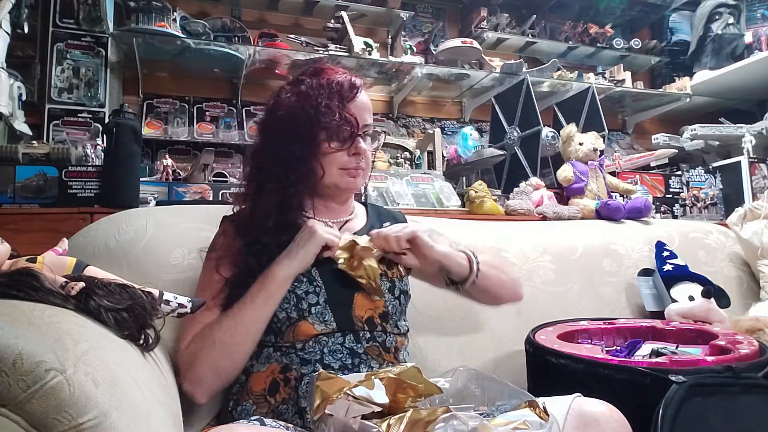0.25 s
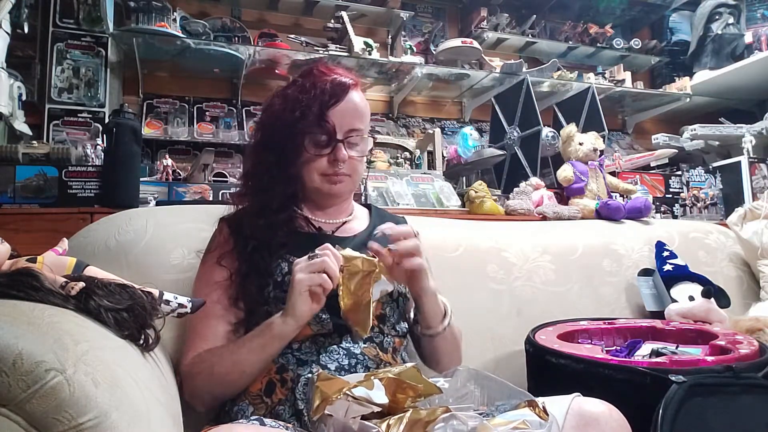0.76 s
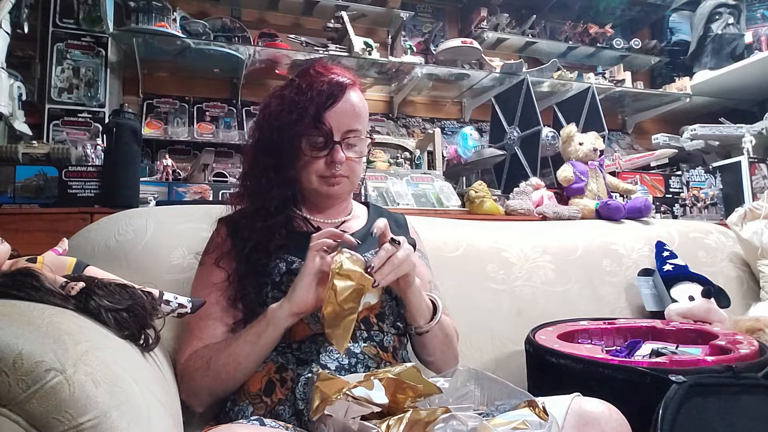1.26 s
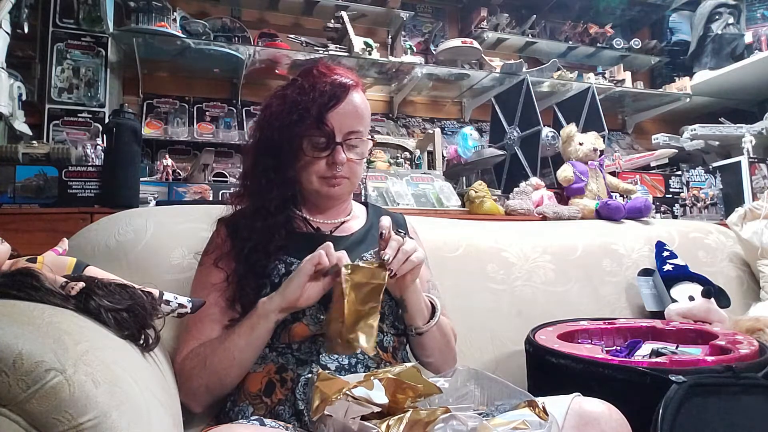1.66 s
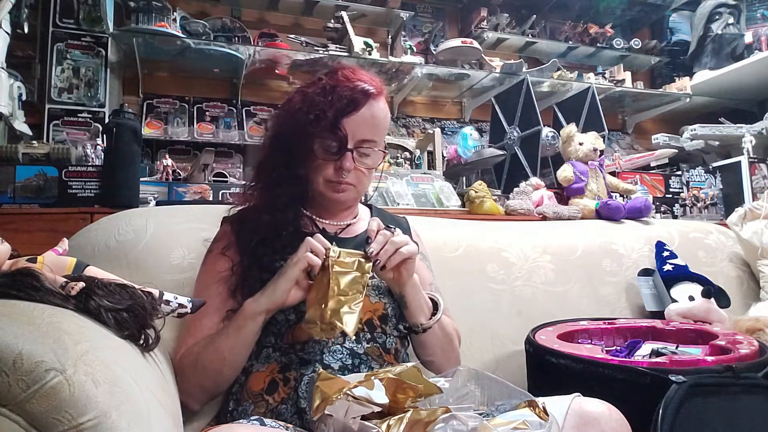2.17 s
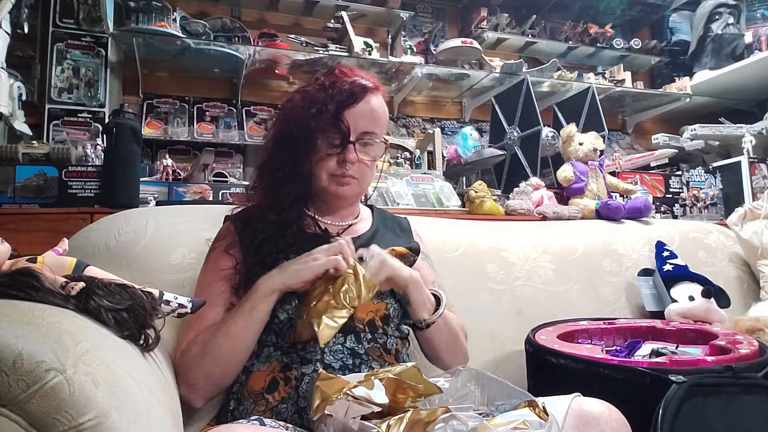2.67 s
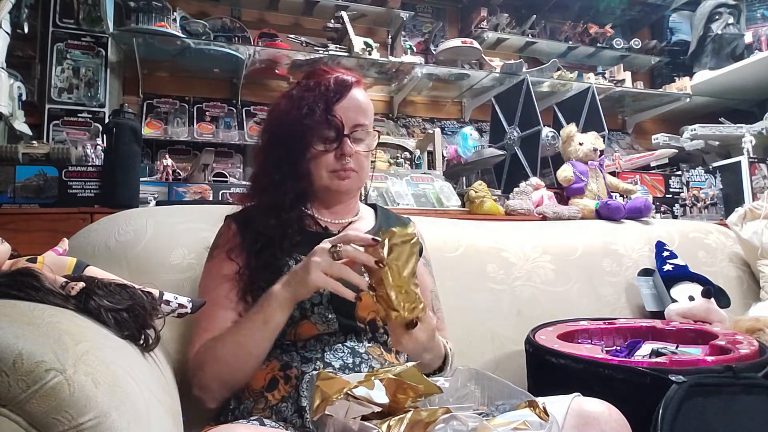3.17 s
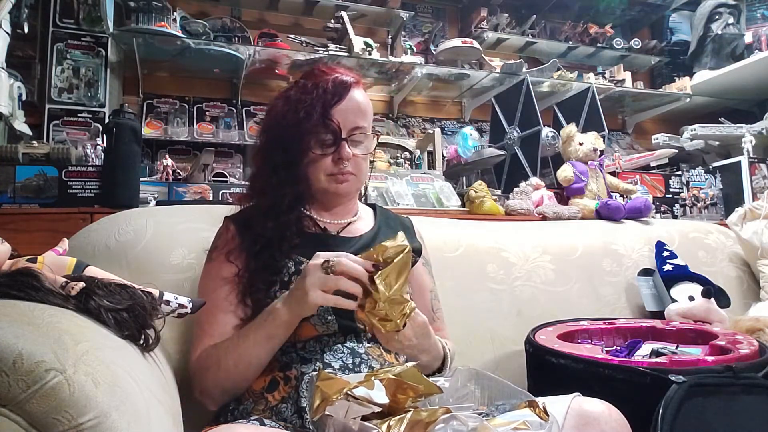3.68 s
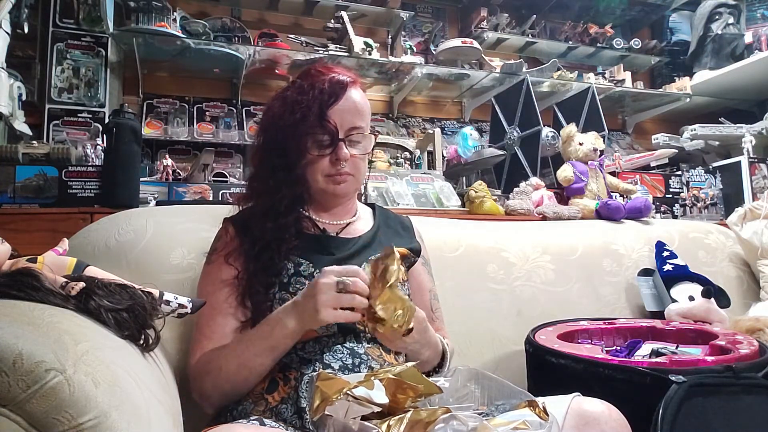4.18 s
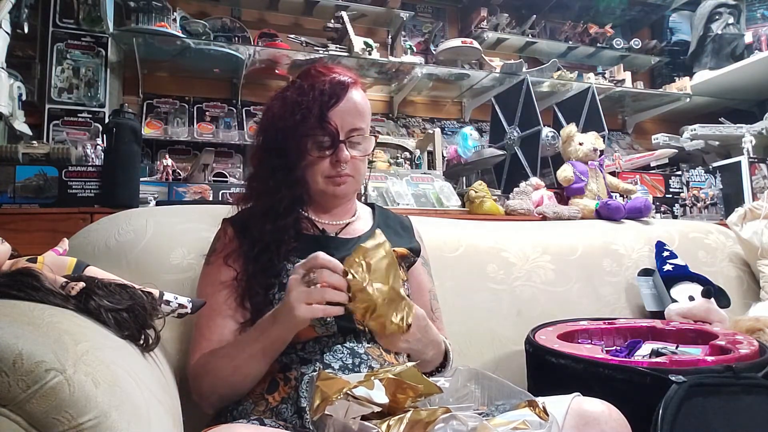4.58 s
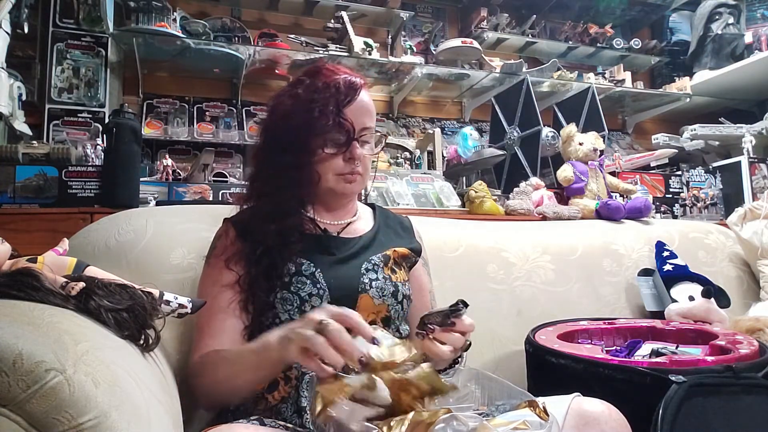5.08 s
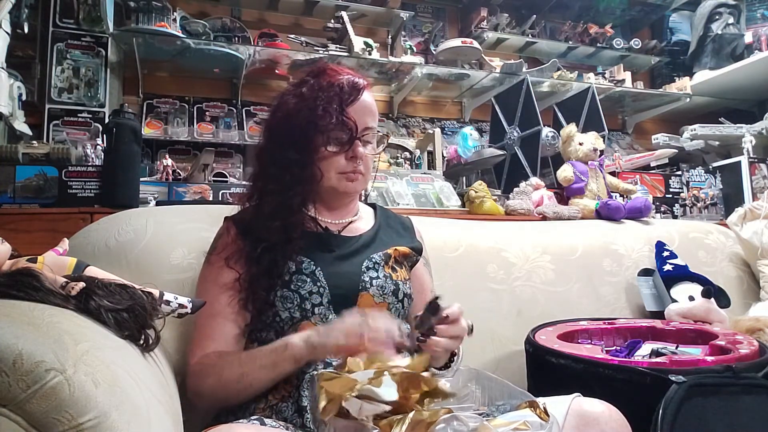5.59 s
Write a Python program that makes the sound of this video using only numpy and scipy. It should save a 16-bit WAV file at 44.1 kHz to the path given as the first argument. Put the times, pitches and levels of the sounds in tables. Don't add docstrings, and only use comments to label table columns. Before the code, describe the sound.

A foil wrapper crackles in uneven clumps of tiny dry snaps: strong at first, faint around one second, busier as it is picked at, nearly still after two seconds, then continuous crinkling for over two seconds as it opens and is emptied. Light slithering foil ends it. Small furnished room, stereo pickup at a short distance, very quiet background air.

```python
import sys
import numpy as np
from scipy import signal
from scipy.fft import rfft, irfft, next_fast_len
from scipy.io import wavfile
from scipy.ndimage import uniform_filter1d

SR = 44100
rng = np.random.default_rng(int(sys.argv[2]) if len(sys.argv) > 2 else 0)


def voltage_ratio(decibels):
    exponent = np.asarray(decibels, float) / 20
    return 10 ** exponent


def to_wav(sig):
    pcm = np.clip(np.atleast_2d(sig), -1, 1) * 32767
    pcm = np.round(pcm).astype(np.int16)
    wavfile.write(sys.argv[1], SR, pcm.T)


N = 257523

PAD_SAMPLES = 64
DROP_S = 4.85


def evened(x):
    return x / np.sqrt(np.mean(x ** 2) + 1e-20)


def read(points, hz):
    f, value = np.transpose(points)
    return np.interp(np.log(hz + 1), np.log(f + 1), value)


def pair(a, b, hz, apart_m):
    same = np.sinc(2 * hz * apart_m / 343)
    return np.array([a, same * a + np.sqrt(np.maximum(1 - same ** 2, 0)) * b])


def air(level_db=-73):
    # frequency in Hz, level in dB per Hz.
    air_colour = [(25, -37), (50, -8.5), (90, -5), (160, -17), (600, -17.5), (1300, -26), (1900, -27),
                  (3000, -30), (7000, -38), (11000, -24), (13000, -40.5), (16000, -36.5), (16500, -65.5)]
    size = next_fast_len(N)
    hz = np.fft.rfftfreq(size, 1 / SR)
    colour = voltage_ratio(read(air_colour, hz))
    field = pair(*rfft(rng.standard_normal((2, size))), hz, 0.31) * colour
    hiss = rfft(rng.standard_normal((2, size))) * colour
    return voltage_ratio(level_db) * evened(irfft(.8 * field + .6 * hiss, size)[:, :N])


def path(lead_samples, start_s=0.0065, rise_s=0.0019, apart_m=0.2, far_db=-20, wet_db=-4.5, size=2 ** 14):
    # frequency in Hz, t60 in s.
    decay = [(250, 0.44), (700, 0.11), (1800, 0.32), (4600, 0.13), (12000, 0.064)]
    # delay in s, level in dB.
    echoes = [
        (.0009, -14.5),
        (.0021, -11.5),
        (.0081, -13.5),
        (.0096, -17),
    ]
    hz, t = np.fft.rfftfreq(size, 1 / SR), np.arange(size) / SR

    def late(s):
        return np.exp(-2j * np.pi * hz * np.reshape(s, (-1, 1)))

    f, frame_s, z = signal.stft(rng.standard_normal((2, size)), SR, nperseg=128)
    fall_db = -60 * frame_s / read(decay, f)[:, None]
    fading = voltage_ratio(fall_db) + voltage_ratio(far_db + 0.5 * fall_db)
    tail = signal.istft(z * fading, SR, nperseg=128)[1][:, :size]
    tail = rfft(tail * np.clip((t - start_s) / rise_s, 0, 1))
    tail = pair(*tail, hz, apart_m) / np.sqrt(uniform_filter1d(abs(tail) ** 2, 300).mean(0))

    early = 0
    for s, db in echoes:
        early = early + voltage_ratio(db) * late(s * rng.uniform(0.66, 1.3) + rng.uniform(0, 0.00034, 2))
    half_s = lead_samples / SR / 2
    direct = late([-half_s, half_s])
    whole = late(PAD_SAMPLES / SR) * (direct + early + voltage_ratio(wet_db) * tail)
    return irfft(whole)[:, :size * 3 // 4]


def room(x, leads_samples=(.6, 2.2, 3.2, 4.2, 6.0), hop_s=.02):
    hops = np.arange(N) / SR / hop_s
    weights = rng.random((len(leads_samples), round(N / SR / hop_s) + 2)) ** 8
    weights = np.array([np.interp(hops, np.arange(len(w)), w) for w in weights])
    weights /= np.linalg.norm(weights, axis=0)
    out = np.zeros((2, N))
    for lead, w in zip(leads_samples, weights):
        heard = signal.oaconvolve((x * w)[None], path(lead), axes=1)
        out += heard[:, PAD_SAMPLES:PAD_SAMPLES + N]
    return out


def mouth(x, ring_hz=1720, width_hz=150, level_db=-1.5):
    b, a = signal.iirpeak(ring_hz, ring_hz / width_hz, SR)
    share = np.interp(np.arange(N) / SR, [2.5, 3.6, DROP_S - .1, DROP_S], [0.0, 0.44, 0.79, 0])
    return x + voltage_ratio(level_db) * share * signal.lfilter(b, a, x)


def causal(db):
    log_gain = np.log(voltage_ratio(np.maximum(db, -100)))
    log_gain = np.concatenate([log_gain, log_gain[-2:0:-1]])
    taps = np.fft.ifft(np.exp(np.conj(signal.hilbert(log_gain)))).real[:2048]
    return taps / np.linalg.norm(taps)


def voices(panel_hz=1010, fizz_hz=5450):
    # frequency in Hz, level in dB per Hz.
    foil_colour = [(60, -34.5), (170, -22.5), (223, -9.5), (330, -8), (600, 0), (1110, -15), (1700, -7.5),
                   (2100, -8), (4600, -8), (10500, 8), (12000, 5), (15700, 1), (15950, -39.5), (16700, -72)]
    hz = np.fft.rfftfreq(8192, 1 / SR) + 1

    def below(edge_hz):
        return -10 * np.log10(1 + (hz / edge_hz) ** 8)

    def above(edge_hz):
        return -10 * np.log10(1 + (edge_hz / hz) ** 12)

    foil_db = read(foil_colour, hz)
    ring = causal(foil_db + above(panel_hz) + below(fizz_hz))
    thump = causal(foil_db + below(panel_hz))
    fizz = causal(foil_db + above(fizz_hz))
    return [ring, thump, fizz]


def buckle(noise, last_s, hz, ring):
    t = np.arange(len(noise)) / SR
    rattle = noise * np.exp(-t / last_s)
    rattle[0] += 1.9 * np.sign(noise[0])
    tone = np.sin(2 * np.pi * hz * t) * np.exp(-t / (2.37 * last_s))
    shape = rattle / np.linalg.norm(rattle) + ring * tone / np.linalg.norm(tone)
    return shape / np.linalg.norm(shape)


def grip(edge_db=9.5, edge_shape=1.77):
    # peak in s, build-up in s, let-go in s, level in dB,
    # panel thump in dB against the level.
    closed = [(0.089, 0.067, 0.055, -31, -8.5), (0.271, 0.03, .05, -40.5, -7.5),
              (0.358, 0.049, 0.037, -32, -1.5), (0.479, 0.083, 0.043, -65, -7),
              (0.588, 0.088, 0.038, -46, -3), (.77, 0.025, 0.042, -81, 7), (0.933, 0.0087, 0.16, -56.5, -1),
              (1.139, 0.095, 0.022, -55.5, -5), (1.371, 0.027, 0.046, -48, -2),
              (1.5, 0.052, 0.075, -42, -8.5), (1.701, 0.061, 0.029, -35.5, -4.5),
              (1.86, 0.14, 0.097, -52.5, -6), (1.998, 0.028, 0.073, -55.5, -1.5),
              (2.2, 0.013, 0.017, -85, 16), (2.38, 0.084, 0.079, -79, 5)]
    # peak in s, build-up in s, let-go in s, level in dB,
    # panel thump in dB against the level.
    opened = [(2.525, 0.0048, 0.1, -53, 2.5), (2.711, 0.079, 0.083, -41, 2.5),
              (2.89, 0.19, 0.095, -42, -1.5), (3.089, 0.061, 0.028, -51, 4), (3.17, 0.053, 0.1, -62.5, 6),
              (3.372, 0.069, 0.059, -42, -0.5), (3.492, 0.059, 0.026, -42.5, 1.5),
              (3.631, 0.094, 0.036, -37, -3), (3.822, 0.16, 0.055, -38.5, -1.5),
              (3.96, 0.058, 0.054, -38.5, -1), (4.071, 0.14, 0.077, -34.5, -5.5),
              (4.24, 0.18, 0.37, -43.5, -4), (4.429, 0.018, 0.037, -35, -1), (4.52, 0.052, 0.054, -40.5, 3),
              (4.658, 0.056, 0.094, -40.5, 2.5), (4.83, 0.1, 0.069, -63.5, -46),
              (5.0, 0.037, 0.038, -56.5, -16), (5.11, 0.061, 0.059, -50, -2),
              (5.435, 0.005, .05, -47.5, -19), (5.481, 0.035, 0.048, -41.5, -6),
              (5.601, 0.044, 0.072, -52, -5)]
    t = np.arange(0, N + 64, 64) / SR
    peak_s, build_s, go_s, level_db, thump_db = np.transpose(closed + opened)[:, :, None]
    away = np.where(t < peak_s, (peak_s - t) / build_s, (t - peak_s) / go_s)
    ring = voltage_ratio(level_db - np.minimum(edge_db * away ** edge_shape, 90)) ** 2
    power = [ring.sum(0), (ring * voltage_ratio(thump_db) ** 2).sum(0)]
    return [np.interp(np.arange(N) / SR, t, 10 * np.log10(p)) for p in power]


def swarm(per_s=520, spread_db=3.0, colour_db=2.5, clump_db=2.0, last_s=0.00037, ring=0.43, count=9):
    clumps = evened(uniform_filter1d(uniform_filter1d(rng.standard_normal(N), 330), 330))
    draw = rng.random(N)
    size = np.minimum(rng.exponential(1, N), 3.1)
    train = (draw < per_s / SR) * voltage_ratio(spread_db * size)
    kind = rng.integers(0, count, N)
    pitch_hz = np.geomspace(1500, 4500, count)
    noise = rng.standard_normal((count, 128))
    coloured = train * voltage_ratio(colour_db * rng.standard_normal((3, N)))
    out = np.zeros((3, N))
    for k in range(count):
        shapes = [buckle(noise[k], last_s, pitch_hz[k], share) for share in (ring, 0, 0)]
        out += signal.oaconvolve(coloured * (kind == k), shapes, axes=1)[:, :N]
    out /= np.sqrt(uniform_filter1d(out ** 2, 3000, axis=1) + 1e-9)

    ring_db, thump_db = grip()
    loose = np.arange(N) / SR > DROP_S
    effort_db = np.maximum(ring_db + 35.5, -30)
    fizz_db = ring_db - 2.5 * loose - 0.1266 * effort_db
    level = voltage_ratio([ring_db - 1.5, thump_db - 3, fizz_db])
    slide = voltage_ratio(-5.5 + 6.5 * loose + 0.05 * effort_db)
    mixed = (out + slide * rng.standard_normal(N)) / np.sqrt(1 + slide ** 2)
    return level * voltage_ratio(clump_db * clumps) * mixed


def snaps(last_s=0.00072, ring=0.28, lift_db=(12, 11, 15), delay_s=.0009, thump_db=-16.5, scatter_db=3.5):
    # start in s, peak in dB, crease ring in Hz,
    # fizz in dB against the peak.
    tug = [(0.0214, -24, 1820, -10), (0.0682, -9, 4460, -9), (0.2134, -37, 1800, -7),
           (0.2289, -30, 4170, -1), (0.2533, -18.5, 1770, -23), (0.2793, -19.5, 3600, -13),
           (0.3481, -20.5, 1790, -20), (0.3865, -22, 1940, -17), (0.4474, -27, 1940, -31),
           (0.4913, -40, 1890, -16), (0.5072, -31.5, 1660, -16), (0.5581, -28.5, 1650, -8),
           (0.5876, -28, 2600, -13), (0.6434, -39, 4030, -15), (0.7452, -52.5, 2300, -28),
           (0.8884, -59, 1970, 2.5), (0.9358, -39.5, 3660, -23), (0.9742, -36.5, 1990, 1),
           (1.0106, -36, 1770, -15), (1.0685, -40, 1660, -5), (1.0854, -44, 3080, -1),
           (1.1009, -41, 2800, 7), (1.1368, -29.5, 3400, -17), (1.275, -49, 3930, 5.5)]
    pick = [(1.3204, -50, 2490, -6), (1.3534, -31, 1980, 6), (1.4322, -21, 2980, -4.5),
            (1.482, -21, 3350, -22), (1.5308, -28.5, 1780, 4), (1.5835, -29.5, 1260, -18),
            (1.632, -23.5, 2720, -10), (1.6555, -39, 2340, -8), (1.677, -19.5, 4100, -4),
            (1.6926, -20.5, 1650, 1), (1.7692, -36, 1950, 3), (1.793, -35, 2830, 2.5),
            (1.8391, -27.5, 1860, -0.5), (1.875, -26.5, 3020, -10), (1.9074, -31, 1770, 6.5),
            (1.9608, -32, 1860, 4.5), (1.9873, -23.5, 2340, -1), (2.0519, -33, 1880, 6),
            (2.1914, -56.5, 1790, -20), (2.2677, -47.5, 1880, -5), (2.3504, -59, 1550, -16.5),
            (2.3686, -58, 1630, -19), (2.3875, -52, 1690, -15), (2.4421, -59, 1800, 24.5),
            (2.5172, -42, 1750, 10.5), (2.54, -34, 1830, -16)]
    tear = [(2.5803, -33.5, 4170, -7), (2.5973, -25, 1860, -4), (2.6423, -25, 1720, -19),
            (2.6613, -24, 1810, -17), (2.6819, -24.5, 1970, -1), (2.7056, -19, 1780, 4),
            (2.797, -33.5, 2200, 15), (2.8512, -28.5, 1890, -10), (2.8846, -33, 2460, 10),
            (2.8992, -22.5, 1280, -0.5), (2.967, -38, 1700, -5), (2.976, -22, 3900, -4),
            (3.0303, -32.5, 1770, 0), (3.064, -32, 1830, -5.5), (3.0863, -28, 1650, 0),
            (3.1436, -33, 1420, -19), (3.167, -32.5, 2220, -20), (3.1883, -32, 2620, -18),
            (3.2357, -36.5, 1700, 0.5), (3.2783, -35.5, 1660, -10), (3.2954, -26.5, 1540, -8),
            (3.3496, -26.5, 3570, -11), (3.4735, -33, 2660, -5), (3.4882, -23, 1500, -2),
            (3.5361, -30, 1600, -14), (3.5842, -26, 1650, -11), (3.613, -30, 2170, -7),
            (3.6464, -20, 1730, 3.5)]
    empty = [(3.714, -21, 2920, -14), (3.8156, -13.5, 2200, -15), (3.8837, -29, 2450, 5.5),
             (3.917, -24, 2540, 1), (3.9333, -21.5, 1660, -1), (3.9647, -24, 1780, -13),
             (4.0144, -17, 1850, -18.5), (4.0993, -23.5, 1870, 5.5), (4.1447, -44, 1770, 10),
             (4.2007, -27, 1820, -11.5), (4.2536, -34, 1680, -14), (4.2923, -22.5, 1680, -6),
             (4.3496, -29.5, 1570, -9), (4.4104, -23, 1540, -0.5), (4.4238, -22, 2000, 6.5),
             (4.492, -17, 1510, -26), (4.547, -24.5, 1880, 3), (4.6012, -31.5, 2410, 3),
             (4.6307, -26.5, 2460, 5.5), (4.6596, -23.5, 3220, -4), (4.713, -26.5, 2490, -21),
             (4.7843, -28, 1490, -7), (4.8402, -35, 3470, 5), (4.9084, -37.5, 2110, -5.5),
             (4.9762, -38, 2750, -19), (5.0677, -39, 3060, -4.5), (5.106, -33, 2060, -4),
             (5.4184, -50.5, 2500, 4), (5.4369, -48, 2770, -10), (5.4615, -37, 1980, 9)]
    further = [(0.0347, -19, 1930, -8), (0.3106, -22, 2720, -5), (0.9272, -38.5, 1800, -21),
               (1.121, -33.5, 3500, -9), (2.5251, -32, 1740, -15), (2.5863, -29.5, 1820, -11),
               (2.9216, -24.5, 2430, 6), (2.9382, -30, 2320, 0), (3.3606, -20, 1520, -29),
               (4.0312, -25.5, 1720, -15), (4.0513, -20.5, 1910, -11), (4.793, -34.5, 2000, -15)]
    rows = tug + pick + tear + empty + further
    out = np.zeros((3, N + 400))
    draws = rng.standard_normal((len(rows), 301))
    for (s, peak_db, hz, fizz_db), draw in zip(rows, draws):
        size, noise = draw[0], draw[1:]
        at = round((s + delay_s) * SR)
        long_s = last_s * (1 + 1.5 * voltage_ratio(peak_db + 10))
        shapes = [buckle(noise, long_s, hz, ring),
                  buckle(noise, 3 * long_s, hz, 0),
                  buckle(noise, 0.39 * long_s, hz, 0)]
        parts_db = [0, thump_db + scatter_db * size, fizz_db]
        out[:, at:at + 300] += voltage_ratio(peak_db + np.add(parts_db, lift_db))[:, None] * shapes
    return out[:, :N]


def scene():
    drive = snaps() + swarm()
    foil = sum(signal.oaconvolve(row, voice)[:N] for row, voice in zip(drive, voices()))
    return room(mouth(foil)) + air()


def top_cut(x):
    return signal.sosfilt(signal.butter(12, 16660, fs=SR, output="sos"), x)


def record(dry):
    # frequency in Hz, left minus right in dB.
    lean = [(60, -1), (180, -3.5), (550, -1), (1650, 1.5), (4970, -1), (15000, 1)]
    size = next_fast_len(N)
    lean_db = read(lean, np.fft.rfftfreq(size, 1 / SR)) * [[.5], [-.5]]
    mix = irfft(rfft(dry, size) * voltage_ratio(lean_db), size)[:, :N]
    return top_cut(mix)


dry = scene()
out = record(dry)
to_wav(out)
```